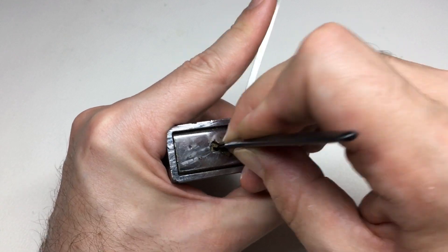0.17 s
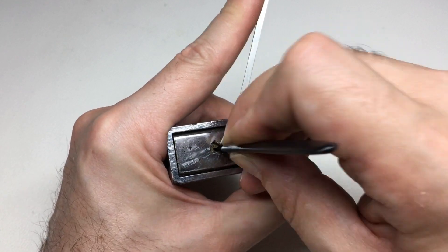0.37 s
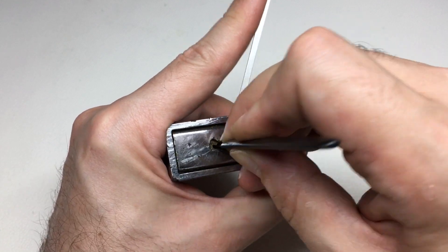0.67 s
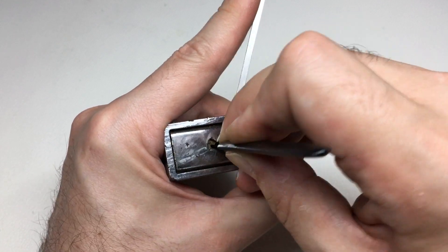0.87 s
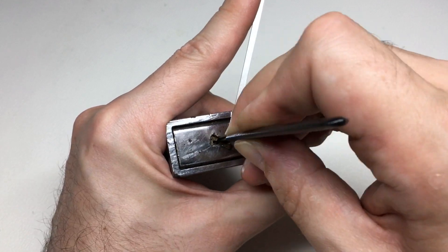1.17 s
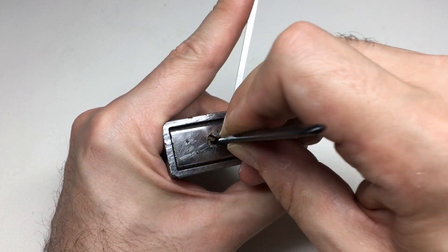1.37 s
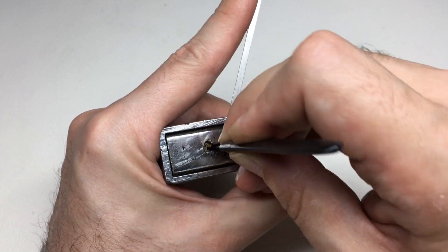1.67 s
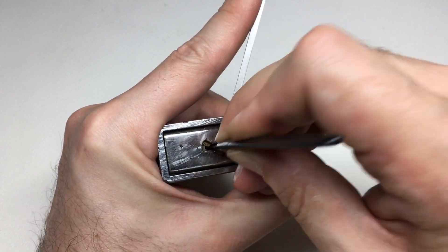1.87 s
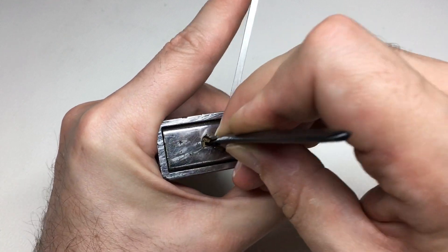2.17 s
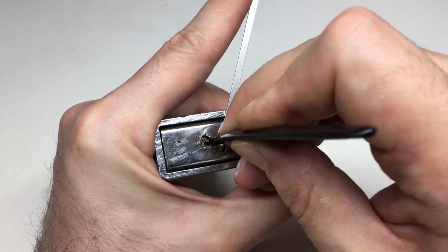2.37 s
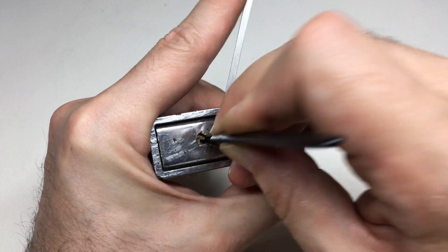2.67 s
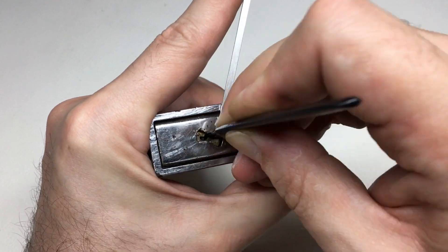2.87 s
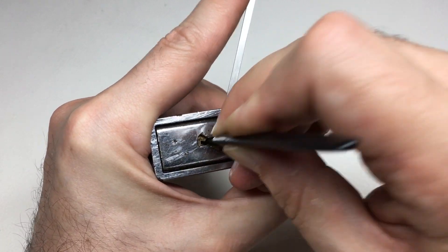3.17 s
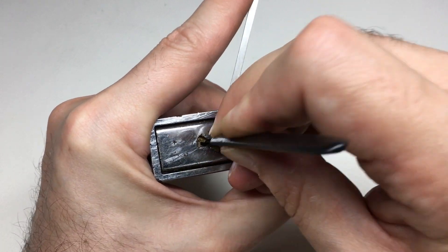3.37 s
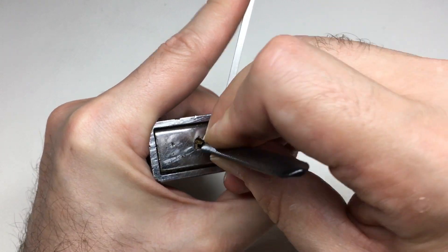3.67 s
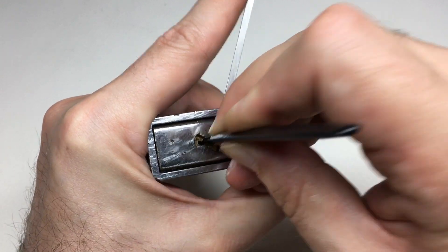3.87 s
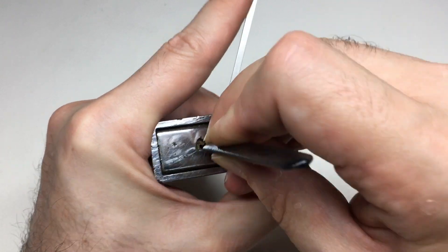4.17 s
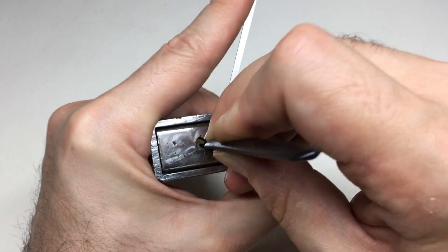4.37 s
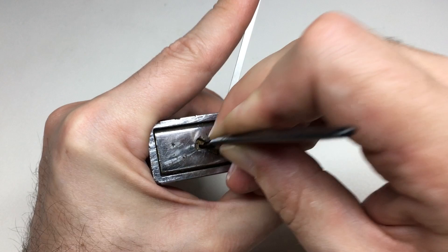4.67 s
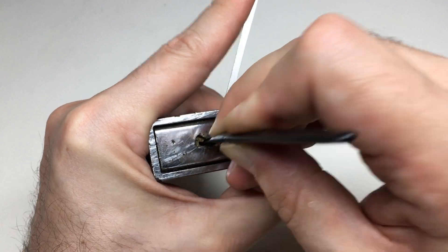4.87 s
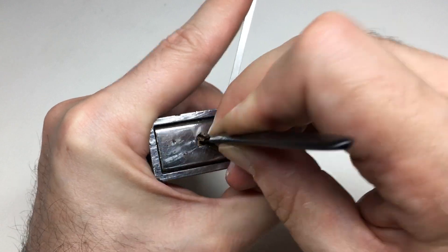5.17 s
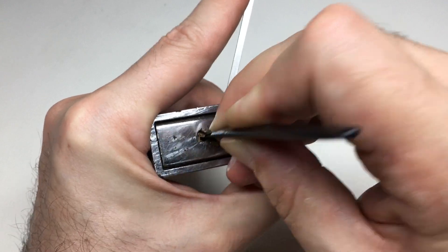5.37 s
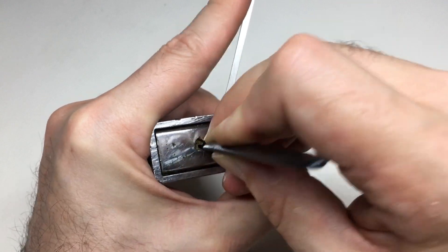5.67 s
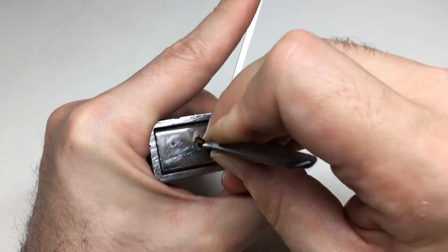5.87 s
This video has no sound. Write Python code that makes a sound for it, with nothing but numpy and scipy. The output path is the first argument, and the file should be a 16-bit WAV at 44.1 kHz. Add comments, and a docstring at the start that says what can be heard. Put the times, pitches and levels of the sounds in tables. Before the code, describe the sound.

Very close, a thin steel pick rakes a hand-held padlock about nine strokes a second. Small, crisp, bright clicks come in uneven clusters with fine scraping and chatter between them. In the first two seconds the hands bump the table, with hard booming knocks around one second and another near 1.7. Then the ticking grows sharper, ending in a brief rub. Small room, low rumble.

```python
"""A thin steel pick is raked in and out of a hand-held padlock, about nine strokes a second, close to the microphone.
Each snapping pin is a noise burst and a click that ring steel tones and jolt the case; lighter pins chatter after it.
Scraping and grating are grains of noise; the table top and a small room throw the lock's sounds back.
The hands bump the table, whose decaying modes boom through the microphone stand; a rub of noise ends the raking.
Coloured noise and a sine make the low rumble, hiss and hum underneath."""
import sys
import numpy as np
from scipy import signal
from scipy.fft import rfft, irfft
from scipy.io import wavfile
from scipy.ndimage import uniform_filter1d

SR = 44100
rng = np.random.default_rng(int(sys.argv[2]) if len(sys.argv) > 2 else 0)


def materialize(psi):
    """Save the field psi as 16-bit PCM at rate SR to the path in sys.argv[1].

    A 1-D psi becomes a single channel; in a 2-D psi each row is a channel.
    """
    bounded = np.clip(np.atleast_2d(psi).T, -1, 1)
    quanta = np.round(bounded * 32767).astype(np.int16)
    wavfile.write(sys.argv[1], SR, quanta)


N = 266055
TIME = np.arange(N) / SR

# Pins that snap clearly. Each row: time in seconds, level in dB, tilt of the body (below 2.6 kHz) in dB,
# tilt of the edge (above 11.5 kHz) in dB; raking() offsets both tilts.
PINS = [(0.0384, -50, -13, -12), (0.0512, -42.5, -8.5, 5.5), (0.126, -52, -6.5, -8), (0.1623, -43, -6.5, 7),
        (0.181, -53.5, -1, 4), (0.2526, -41.5, -4, 8.5), (0.2622, -41.5, -7, 2.5), (0.408, -45.5, -9, -3.5),
        (0.5087, -47.5, 4.5, 1), (0.5951, -62, -2, 2), (0.6901, -43, -9.5, 6.5), (0.8051, -48, -1, 4),
        (0.826, -55, 7, -5), (0.8676, -42, -4.5, 4), (0.9372, -45, -7, 4), (0.9614, -41.5, -2.5, 2.5),
        (1.079, -51.5, 0, -7), (1.1176, -40.5, -11.5, 7), (1.1518, -50, -5, 9), (1.1927, -50.5, -14, -3),
        (1.2065, -39.5, -10, 6.5), (1.298, -53, -12, -6), (1.3293, -53, -2, -5), (1.348, -43.5, -3.5, 7),
        (1.411, -46, -12.5, -12), (1.432, -45.5, -9, -0.5), (1.455, -53.5, 0, -4), (1.544, -50, -2, -4),
        (1.5576, -41.5, -1, 6.5), (1.6427, -44.5, -6, -5), (1.6548, -43.5, -5, 0), (1.6633, -45.5, -14, -2),
        (1.7636, -50, -6, -7), (1.7908, -48.5, 0, -0.5), (1.7967, -40, -6.5, 6), (1.8938, -47, -3, -6),
        (1.9953, -35, -5, 13), (2.0214, -51.5, -12, -3), (2.0888, -43, -0.5, 4), (2.1114, -47, -2, -1),
        (2.242, -51.5, -5, -10), (2.2557, -43.5, 1, 8.5), (2.348, -47.5, -8, -7), (2.358, -45, -9.5, -3),
        (2.3669, -44, -4.5, 0), (2.5185, -49.5, -10.5, -3), (2.546, -58, -2, -2), (2.6328, -48, -8, 6),
        (2.674, -53, 13.5, 7), (2.7423, -45.5, -2.5, 1), (2.7628, -53.5, 12, 0), (2.7789, -43.5, -12, 10.5),
        (2.8717, -45.5, -3, 1.5), (2.9026, -53.5, -4.5, -7), (2.9739, -54, -4, -6), (3.0021, -43, -8, 6.5),
        (3.0594, -48.5, -1, 2.5), (3.1655, -45.5, 0.5, -7), (3.2713, -46.5, -1, 5.5),
        (3.3285, -55.5, 9, -10), (3.364, -37, -4, 4.5), (3.3715, -30.5, -16, 5), (3.4298, -45.5, -6, 0),
        (3.4672, -46, -15, 6.5), (3.5585, -51, -5, -4), (3.5745, -47, -9, 2), (3.5888, -50.5, -5, -1),
        (3.6243, -50.5, -8, -4), (3.6856, -39, -5, 2.5), (3.7079, -39, -4, 5), (3.7299, -45, -1, 11),
        (3.7936, -46, -3, 3), (3.81, -42.5, -7, 5), (3.8893, -46.5, 3, 1), (3.9075, -50, -1, -14),
        (3.9188, -37, -8, 5.5), (3.946, -42, -16, 6), (4.0086, -43.5, -4, 4.5), (4.019, -43.5, 3.5, 4.5),
        (4.0264, -44, -27, -7), (4.1284, -50.5, -4.5, 0), (4.153, -40, -4.5, 2), (4.2518, -47, -1.5, 2),
        (4.328, -46.5, -6, -3), (4.3713, -41.5, 1.5, 6.5), (4.459, -45, -1, 0), (4.5685, -34, -4, 14),
        (4.6584, -53, -7, -6), (4.6656, -41.5, -3, -3), (4.7357, -51, -10, -9), (4.7529, -34.5, -8, 6.5),
        (4.7684, -38, 0, 5.5), (4.7772, -43, -14, 9), (4.843, -42, -20, 5), (4.8526, -42.5, 12, 1),
        (4.86, -44.5, -28, 0), (4.9791, -49.5, -5, -5), (5.0635, -47.5, -0.5, 5.5),
        (5.1466, -40.5, -2.5, -2.5), (5.1683, -55, -1, -1), (5.1832, -41, 4.5, 12.5),
        (5.2103, -46.5, 12, 8), (5.2667, -40.5, -4, 10), (5.274, -43.5, -3, -1), (5.2812, -45, -3, 6),
        (5.3184, -45.5, -7.5, -2), (5.3826, -42, -2.5, -2.5), (5.4028, -49.5, 2, -8), (5.4629, -56, 9, -16),
        (5.498, -46, 1.5, 1.5), (5.5941, -44, -2.5, -6), (5.63, -55, 9, -2), (5.7209, -58, 6, -2),
        (5.7456, -57, 6, 0), (5.7606, -35.5, -6, 2.5), (5.7728, -42, -2, 6), (5.8156, -37.5, 1, 11),
        (5.8405, -47, 0, 16), (5.8547, -34.5, -3.5, -8)]
# Colour of a tick before its tilt. Each row: frequency in Hz, filter gain in dB.
TICK_COLOUR = [(100, -19), (400, 4), (950, -11.5), (1500, -4), (2000, 1.5), (2600, 0.5), (3250, 4.5),
               (4200, -4.5), (5000, 4), (8000, 2.5), (10400, 1.5), (12200, 7), (14000, 5.5), (15500, -3.5)]


def gain_of(db):
    """Decibels to amplitude."""
    return 10 ** (np.asarray(db) / 20)


def evened(x):
    """Scales to rms 1."""
    return x / np.sqrt(np.mean(x ** 2) + 1e-20)


def read(points, hz):
    """Interpolates a dB spectrum on a log-frequency axis."""
    f, value = np.transpose(points)
    return np.interp(np.log(hz + 1), np.log(f + 1), value)


def level(rows):
    """A curve of (s, dB) as a gain for every sample."""
    return gain_of(np.interp(TIME, *np.transpose(rows)))


def add(mix, s, sound):
    """Mixes a sound in at time s."""
    part = mix[max(round(s * SR), 0):][:len(sound)]
    part += sound[:len(part)]


def coloured(x, db):
    """Filters a full-length signal by a gain in dB per rfft bin, then scales it to rms 1."""
    return evened(irfft(rfft(x) * gain_of(db), N))


def noise(spectrum):
    """Steady noise of a given colour, rms 1."""
    return coloured(rng.standard_normal(N), read(spectrum, np.fft.rfftfreq(N, 1 / SR)))


def sparse_grains(grains_per_s):
    """Impulses of random size at random times."""
    return rng.standard_normal(N) * (rng.random(N) < grains_per_s / SR)


def causal(x, db):
    """Minimum-phase filter (dB per rfft bin): colours a short sound without blurring its attack."""
    log_gain = np.log(gain_of(np.r_[db, db[-2:0:-1]]))
    response = np.exp(np.conj(signal.hilbert(log_gain)))[:len(db)]
    return irfft(rfft(x) * response)


def swell(start_s, attack_s, hold_s, release_s):
    """An envelope that rises linearly, holds and dies away exponentially."""
    rise = np.clip((TIME - start_s) / attack_s, 0, 1)
    return rise * np.exp(-np.maximum(TIME - start_s - attack_s - hold_s, 0) / release_s)


def wander(max_hz, count=20):
    """Slow irregular drift of rms 1: sines of random phase, none faster than max_hz."""
    hz = max_hz * np.geomspace(.1, 1, count)[:, None]
    return evened(np.sin(2 * np.pi * (hz * TIME + rng.random(hz.shape))).sum(0))


def background(rumble_swell_db=2.5, swells_per_s=5, floor_db=-55.5, waver_db=1, wavers_per_s=9, hum_hz=120.7):
    """Building rumble as swelling low noise, a faint wavering hiss and mains hum as one sine."""
    # Deep rumble. Each row: time in seconds, level in dB.
    rumble_db = [(0, -41), (1.1, -48.5), (1.8, -45.5), (2.8, -50), (3.3, -44), (3.9, -50), (4.3, -47.5),
                 (4.9, -46), (6.03, -49)]
    # Colour of the rumble. Each row: frequency in Hz, filter gain in dB.
    rumble_colour = [(6, -21), (18, -1), (25.5, 4), (33, -15.5), (48, -7.5), (100, -47), (300, -62.5)]
    # Colour of the still room. Each row: frequency in Hz, filter gain in dB.
    floor_colour = [(15, -20), (42, -9.5), (62, -9), (86, -7.5), (96, -9.5), (108, -26), (150, -26.5),
                    (350, -36), (750, -41), (1500, -48.5), (4000, -55.5), (9000, -60), (16000, -91)]
    # Hum. Each row: time in seconds, peak level in dB.
    hum_db = [(0, -65), (2.5, -65.5), (6, -84)]
    rumble_swell = gain_of(rumble_swell_db * wander(swells_per_s))
    rumble = level(rumble_db) * rumble_swell * noise(rumble_colour)
    hiss = gain_of(floor_db + waver_db * wander(wavers_per_s)) * noise(floor_colour)
    hum = level(hum_db) * np.sin(2 * np.pi * hum_hz * TIME)
    return rumble + hiss + hum


def table_ring(hardness_hz, lowest_db, rise_cycles=0.99, linger_db=-25, linger_t60_s=0.6, null_hz=127, null_q=1.76):
    """The table's answer to one blow: each mode swells over its first cycles; a soft blow leaves the upper ones still."""
    # Modes of table and stand. Each row: frequency in Hz, relative level in dB, main decay t60 in seconds.
    modes = [(85.25, 13.5, 0.12), (169.9, 4, 0.14), (235.5, -7.5, 0.071), (297.6, -6, 0.074),
             (389, -12.5, 0.06), (493, -17, 0.12), (649, -10, 0.056), (728, -29, 0.21), (837, -14.5, 0.074),
             (1070, -17, 0.07), (1217, -14, 0.071), (1486, -1, 0.055)]
    t = np.arange(SR // 2) / SR
    out = np.zeros(len(t))
    for k, (hz, db, t60) in enumerate(modes):
        reach = 1 / np.sqrt(1 + (hz / hardness_hz) ** 8)
        rise = (1 - np.exp(-t * hz / rise_cycles)) ** 2
        linger = gain_of(linger_db - 60 * t / linger_t60_s) / (k + 1)  # strongest in the deepest modes
        fade = gain_of(-60 * t / t60) + linger
        strength = reach * gain_of(db + lowest_db * (k == 0))
        out += strength * rise * fade * np.sin(2 * np.pi * hz * t)
    # between the two deepest modes their motions cancel
    return signal.lfilter(*signal.iirnotch(null_hz, null_q, SR), out)


def shifting(nudges_per_s=160, hardness_hz=400, lowest_db=2.5):
    """Many small nudges of the hands keep the table's modes murmuring."""
    # Hands shifting, which rest while the raking is steady. Each row: time in seconds, level in dB.
    shifting_db = [(0, -47.5), (.7, -45), (1.05, -34), (1.3, -46), (1.62, -58.5), (1.85, -58.5),
                   (2.3, -74.5), (5.5, -64), (5.9, -48), (6.03, -54)]
    nudges = sparse_grains(nudges_per_s)
    murmur = signal.oaconvolve(nudges, table_ring(hardness_hz, lowest_db))[:N]
    return level(shifting_db) * evened(murmur)


def bumps(push_db=-6, knock_db=-15, knock_s=0.031, rattle_s=0.036, crack_db=6, crack_s=0.0051, size=8192):
    """Hands knock on the table: a sharp push, a dull thud and the boom of its modes; hard knocks crack and rattle more."""
    # Each row: time in seconds, level in dB, hardness as the corner in Hz above which modes stay still,
    # extra level of the lowest mode in dB.
    blows = [(.002, -37.5, 130, 0.5), (.147, -42, 290, -2), (0.271, -37, 167, 9), (.402, -46.5, 197, 12),
             (0.479, -31.5, 298, 5.5), (.686, -35.5, 227, 0), (.834, -30, 240, -2), (.888, -34, 139, 6.5),
             (0.9658, -13.5, 730, -7.5), (1.076, -14.5, 626, 1), (1.196, -39, 250, -1),
             (1.7056, -15.5, 275, -2), (4.019, -52.5, 200, 11), (4.851, -50.5, 420, 10.5),
             (5.273, -51, 395, 7), (5.614, -54.5, 149, 16), (5.812, -53, 350, 14)]
    base_rattle_db, base_hardness_hz, rattle_db_per_octave = -34.5, 597, 10.5
    t, hz = np.arange(size) / SR, np.fft.rfftfreq(size, 1 / SR)
    rattle_colour = read([(200, -21), (800, 7), (1100, -6.0), (1500, -4.5), (2400, -15.0), (5000, -23),
                          (9000, -34)], hz)
    thud_colour = read([(130, -24.5), (240, -0.5), (420, -2.0), (800, -5.5)], hz)
    onset = (1 - np.exp(-t / 0.00037)) ** 2
    shake = np.exp(-t / rattle_s) + gain_of(crack_db) * np.exp(-t / crack_s)
    out = np.zeros(N)
    for s, db, hardness_hz, lowest_db in blows:
        rattle_db = base_rattle_db + rattle_db_per_octave * np.log2(hardness_hz / base_hardness_hz)
        softness = -10 * np.log10(1 + (hz / (0.48 * hardness_hz)) ** 7)
        dull = np.maximum(softness + thud_colour, -90)
        push = causal(1. * (t == 0), dull)
        thud = evened(causal(rng.standard_normal(size), dull)) * np.exp(-t / knock_s)
        rattle = evened(causal(rng.standard_normal(size), rattle_colour)) * shake
        contact = (gain_of(knock_db) * thud + gain_of(rattle_db) * rattle) * onset
        add(out, s, gain_of(db) * table_ring(hardness_hz, lowest_db))
        add(out, s, gain_of(db) * (contact + gain_of(push_db) * push / abs(push).max()))
    return out


def rub(slip_db=1.5, grains_per_s=7000, slide_db=-53.5, drag_attack_s=0.0031, drag_release_s=0.012,
        knock_s=0.013, size=2048):
    """The pick slides in fine grains while the fingers drag in uneven slips and catch a few times."""
    # Hiss of the sliding pick. Each row: frequency in Hz, filter gain in dB.
    hiss_colour = [(300, -12), (1000, 2.5), (2500, 2.5), (7500, -4), (10000, -11), (16000, -23)]
    # Colour of the dragging fingers. Each row: frequency in Hz, filter gain in dB.
    drag_colour = [(60, -27), (135, -2), (185, 3.5), (250, -5), (335, -11.5), (450, -0.5), (650, -24.5),
                   (950, -15.5), (2000, -55), (6000, -50)]
    # Fingers dragging over the case. Each row: start in seconds, hold in seconds, level in dB.
    drags = [(5.83, 0.07, -56), (5.919, 0.042, -44), (6.005, 0.0069, -58)]
    # Fingers catching on the case. Each row: time in seconds, level in dB.
    catches = [(5.924, -50), (5.9378, -36.5), (6.013, -57)]
    t, hz = np.arange(size) / SR, np.fft.rfftfreq(size, 1 / SR)
    click = 1. * (t == 0)
    grains = sparse_grains(grains_per_s)
    hiss = evened(signal.oaconvolve(grains, causal(click, read(hiss_colour, hz)))[:N])
    slips = gain_of(slip_db * evened(uniform_filter1d(rng.standard_normal(N), 120)))
    slide = gain_of(slide_db) * swell(5.825, attack_s=0.036, hold_s=0.089, release_s=0.033)
    drag = sum(gain_of(db) * swell(s, drag_attack_s, hold_s, drag_release_s) for s, hold_s, db in drags)
    out = slips * (slide * hiss + drag * noise(drag_colour))
    knock = causal(click, read(drag_colour, hz)) * np.exp(-t / knock_s)
    for s, db in catches:
        add(out, s, gain_of(db) * knock / knock[:SR // 250].std())
    return out


def stop(stop_s=5.8145, stop_db=-44.5, pitch_hz=680, width_octaves=0.64, decay_s=0.0037):
    """The pick bottoms out just before the last slide: one short hollow knock of the case, a band of noise."""
    octaves = np.log2((np.fft.rfftfreq(N, 1 / SR) + 1) / pitch_hz)
    band = np.exp(-.5 * (octaves / width_octaves) ** 2)
    hollow = evened(irfft(rfft(rng.standard_normal(N)) * band, N))
    return gain_of(stop_db) * swell(stop_s, 0.00043, 0.00089, decay_s) * hollow


def riding(ride_share=0.38, ride_db=-12, build_s=0.013, grains_per_s=2000, edge_db=-4, size=1024):
    """Before some snaps the pick scrapes up the pin: fine grains that swell until it lets go."""
    effort = np.zeros(N)
    ramp = np.exp(-np.arange(size)[::-1] / SR / build_s)
    for (s, db, _, _), chance in zip(PINS, rng.random(len(PINS))):
        if chance < ride_share:
            add(effort, s - size / SR, gain_of(db + ride_db) * ramp)
    grains = sparse_grains(grains_per_s)
    hz = np.fft.rfftfreq(N, 1 / SR)
    colour = read(TICK_COLOUR, hz) + read([(8000, 0), (11500, edge_db)], hz)
    return effort * coloured(grains, colour)


def grating(ticks, grate_db=-19, grains_per_s=500, stroke_s=0.0052, grain_s=0.0023, size=256):
    """After each pin the pick slides on and grates along the keyway in tiny grains."""
    keep = np.exp(-1 / (stroke_s * SR))
    effort = np.sqrt(signal.lfilter([1 - keep], [1, -keep], ticks ** 2))  # follows the ticks' energy
    grains = sparse_grains(grains_per_s)
    grain = rng.standard_normal(size) * np.exp(-np.arange(size) / SR / grain_s)
    rough = signal.oaconvolve(grains, grain)[:N]
    return gain_of(grate_db) * effort * coloured(rough, read(TICK_COLOUR, np.fft.rfftfreq(N, 1 / SR)))


def tick(body_db, edge_db, contact_ms, snap_s=0.00067, body_s=0.0053, dense_db=-10, scrape_db=-11,
         impact=0.73, ring_db=-26, size=8192):
    """One pin: an impact and a short scrape excite the crowded modes of the lock and a few longer steel tones."""
    # Ringing of lock, pick and tension wrench. Each row: frequency in Hz, relative level in dB, t60 in seconds.
    steel = [(2005, -2, .08), (2240, -4, .07), (3230, -3, .04), (4830, -6, .07), (5065, -4, .06),
             (5403, -1, .09), (6105, -4, .08), (6690, -6, .04), (7420, -6, .06), (7630, -6, .06),
             (8600, -7, .06), (8840, -7, .06), (11930, -3, .07), (12067, -2, .08), (12200, -2, .08),
             (13000, -3, .05)]
    t, hz = np.arange(size) / SR, np.fft.rfftfreq(size, 1 / SR)
    contact_s = max(contact_ms, .05) / 1000
    scrape = t / contact_s * np.exp(1 - t / contact_s)
    dense = np.exp(-t / body_s)
    strike = np.exp(-t / snap_s) + gain_of(scrape_db) * scrape + gain_of(dense_db) * dense
    sound = strike * rng.standard_normal(size) + impact * (t == 0)
    f, db, t60 = np.transpose(steel)[:, :, None]
    # the point of contact changes, so every tick favours other tones
    share, phase = rng.rayleigh(.5, f.shape), rng.random(f.shape)
    tones = share * gain_of(db - 60 * t / t60) * np.sin(2 * np.pi * (f * t + phase))
    ring = tones.sum(0)
    tilt = read([(2600, body_db), (5000, 0.02), (8000, 0), (11500, edge_db)], hz)
    sound = causal(sound + gain_of(ring_db) * ring, read(TICK_COLOUR, hz) + tilt)
    return sound / np.sqrt(np.mean(sound[:SR // 250] ** 2))  # rms 1 over the first 4 ms


def tripped_pins(chatter_db=-16.5, chatter_spread_db=3.5, chatter_gap_s=.005, chatter_lag_scale_s=.009,
                 strays_per_s=4, stray_db=-63):
    """Every snapping pin, after it a lighter one that the same stroke brushes, and a few loose ones in between."""
    light_body_db, light_edge_db = 3.5, 4  # tilts of a light touch
    pins = list(PINS)
    for (s, db, _, _), (wait, force) in zip(PINS, rng.standard_normal((len(PINS), 2))):
        later_s = s + chatter_gap_s + chatter_lag_scale_s * abs(wait)
        pins.append((later_s, db + chatter_db + chatter_spread_db * force, light_body_db, light_edge_db))
    loose = (rng.random(N) < strays_per_s / SR) & (TIME < PINS[-1][0])
    for s in TIME[loose]:
        pins.append((s, stray_db, light_body_db, light_edge_db))
    return pins


def raking(body_db=3.0, edge_db=-4.5, clunk_db=-19, clunk_s=0.01, size=2048):
    """All the pins that the pick trips; each also jolts the lock's case, a dull clunk damped by the hand."""
    # a hard snap is over at once, a light touch scrapes: contact doubles for each doubling_db of fall
    mid_contact_ms, mid_level_db, doubling_db = 0.27, -37, 7
    contact_spread = 0.53  # natural log
    out, t = np.zeros(N), np.arange(size) / SR
    case_colour = read([(100, 12), (350, -37.0), (600, 3.5), (950, -2.5), (1400, 7.0), (2500, -40),
                        (8000, -29)], np.fft.rfftfreq(size, 1 / SR))
    clunk_envelope = np.exp(-t / clunk_s) * (1 - np.exp(-t / 0.00011))
    for s, db, body, edge in tripped_pins():
        scatter = np.exp(contact_spread * rng.standard_normal())
        contact_ms = mid_contact_ms * 2 ** ((mid_level_db - db) / doubling_db) * scatter
        clunk = evened(causal(rng.standard_normal(size), case_colour)) * clunk_envelope
        add(out, s, gain_of(db) * tick(body + body_db, edge + edge_db, contact_ms))
        add(out, s, gain_of(db + clunk_db + (body - max(edge, 0)) / 2) * clunk)
    return out


def room(x, tail_db=-13.5, onset_s=0.00058, sway_s=.00012, sway_hz=1.3):
    """A few close reflections with swaying delays, then a faint short tail of decaying noise."""
    # Nearby surfaces. Each row: mean delay in seconds, level in dB.
    echoes = [(.00295, -11), (.0041, -19.5), (.0055, -13.5), (.0098, -30), (0.011, -17.5)]
    # Decay of the tail. Each row: frequency in Hz, t60 in seconds.
    room_t60 = [(200, 0.23), (2000, 0.34), (6000, 0.27), (16000, 0.2)]
    t = np.arange(SR // 2) / SR
    hz, at, z = signal.stft(rng.standard_normal(len(t)), SR, nperseg=256)
    decay = gain_of(-60 * at / read(room_t60, hz)[:, None])
    tail = signal.istft(z * decay, SR, nperseg=256)[1][:len(t)]
    tail = tail * (1 - np.exp(-t / onset_s)) ** 2
    out = x + gain_of(tail_db) * signal.fftconvolve(x, tail / np.linalg.norm(tail))[:N]
    for delay_s, db in echoes:
        # the hands move, so the paths change
        sway = sway_s * np.sin(2 * np.pi * (sway_hz * TIME + rng.random()))
        source = np.round((TIME - delay_s - sway) * SR).astype(int)
        out = out + gain_of(db) * x[np.clip(source, 0, N - 1)]
    return out


def scene():
    """Lock sounds pass through the room; the rub, the table's boom and the background reach the microphone directly."""
    around = rub() + bumps() + shifting() + background()
    scrapes, ticks = riding(), raking()
    lock = scrapes + ticks + grating(ticks) + stop()
    return (room(lock) + around)[None]


def record(dry, edge_hz=16000):
    """The recorder's band limit, a linear-phase low-pass."""
    lowpass = signal.firwin(255, edge_hz, window=("kaiser", 9), fs=SR)
    return signal.oaconvolve(dry, lowpass[None], "same")


dry = scene()
out = record(dry)
materialize(out)
```